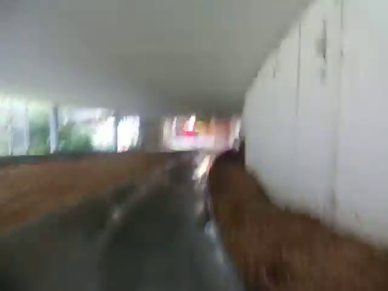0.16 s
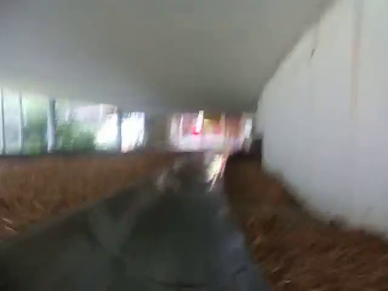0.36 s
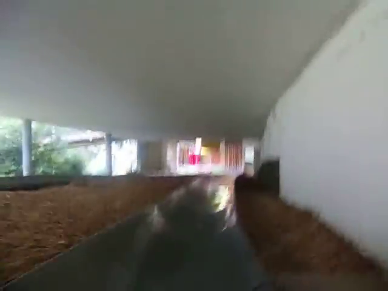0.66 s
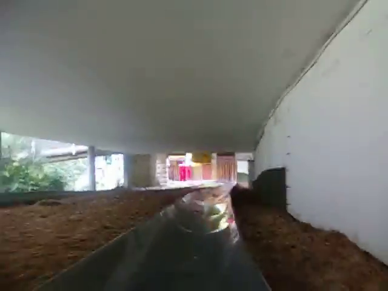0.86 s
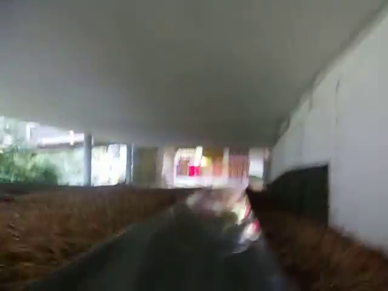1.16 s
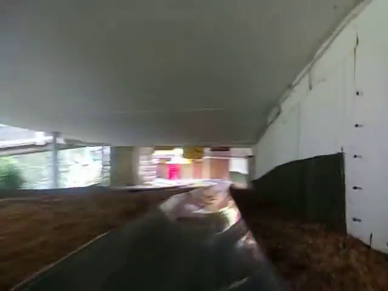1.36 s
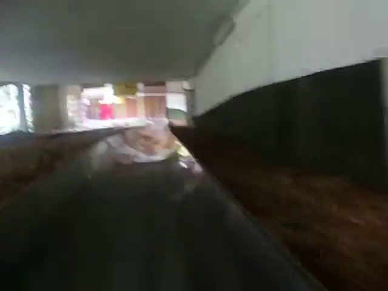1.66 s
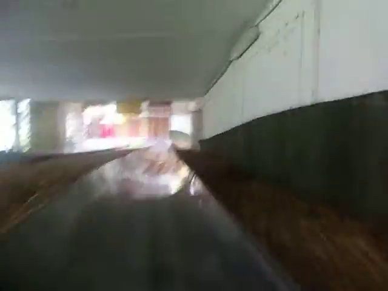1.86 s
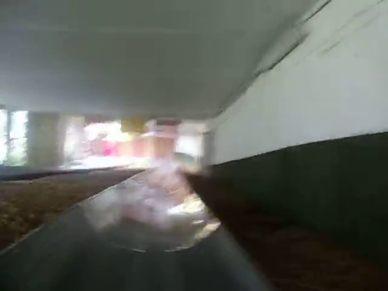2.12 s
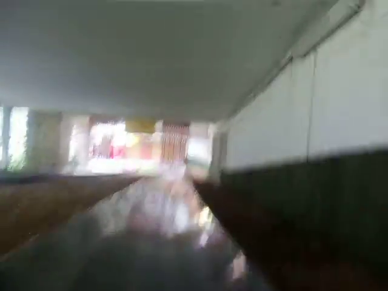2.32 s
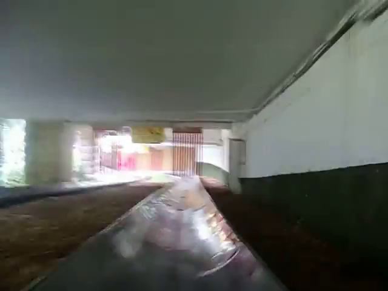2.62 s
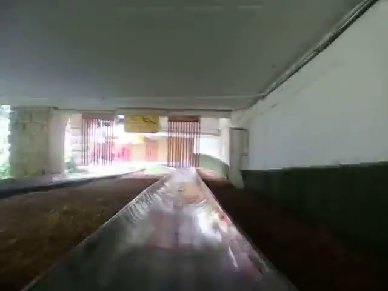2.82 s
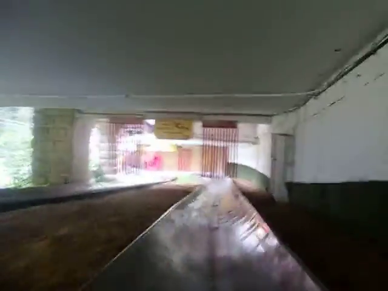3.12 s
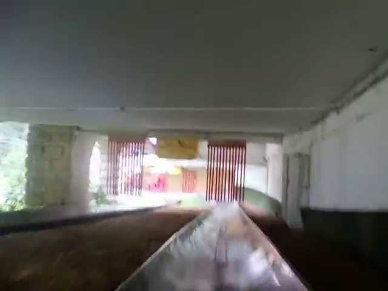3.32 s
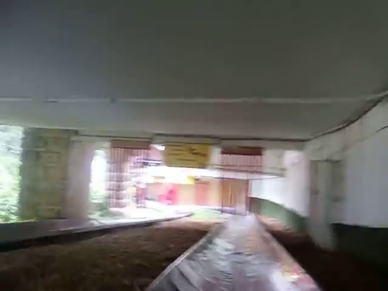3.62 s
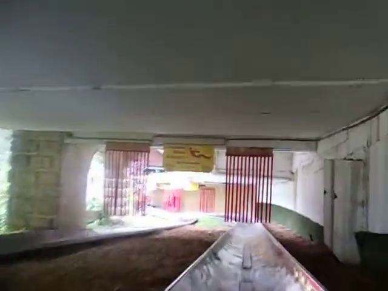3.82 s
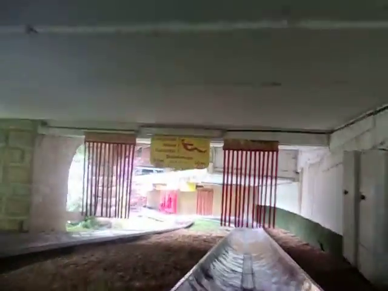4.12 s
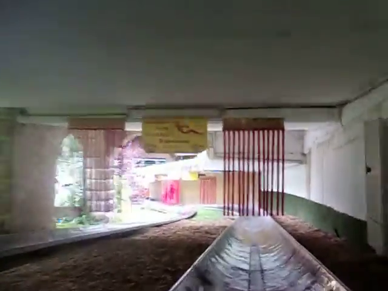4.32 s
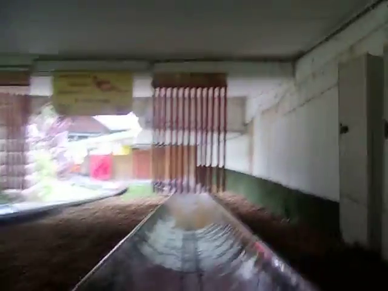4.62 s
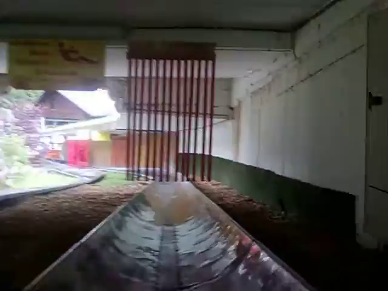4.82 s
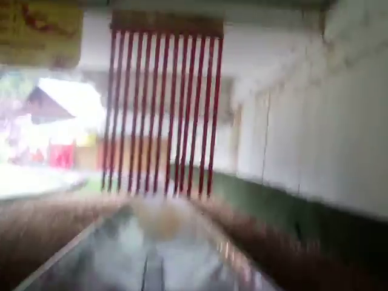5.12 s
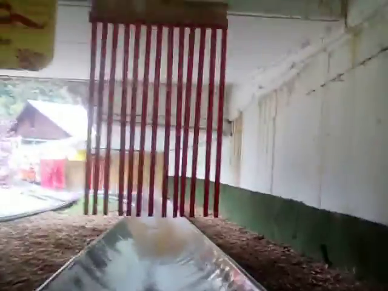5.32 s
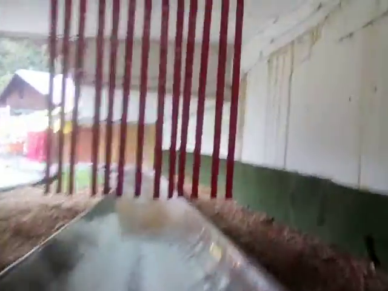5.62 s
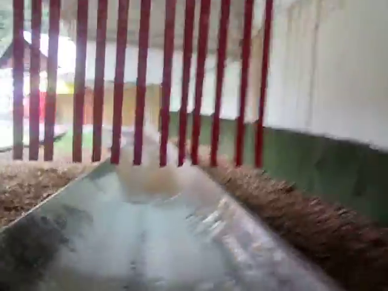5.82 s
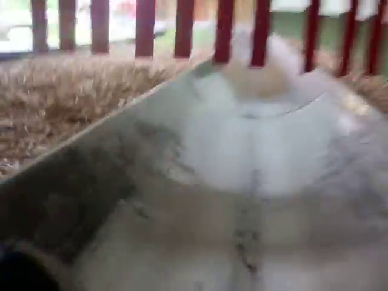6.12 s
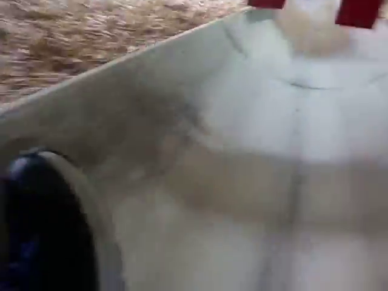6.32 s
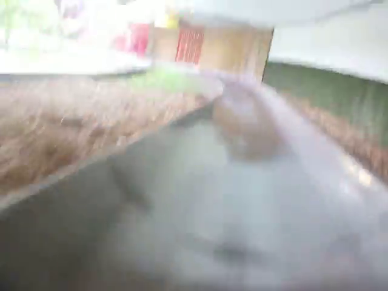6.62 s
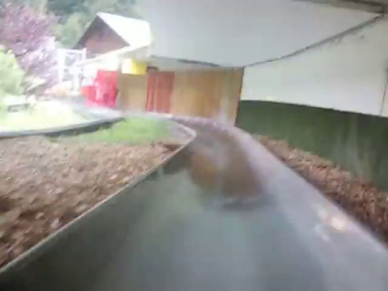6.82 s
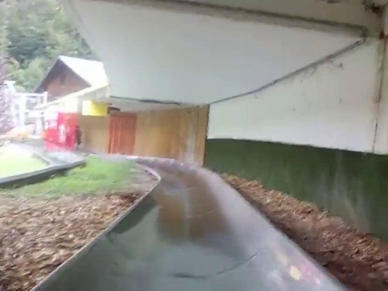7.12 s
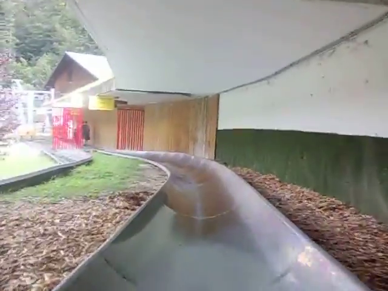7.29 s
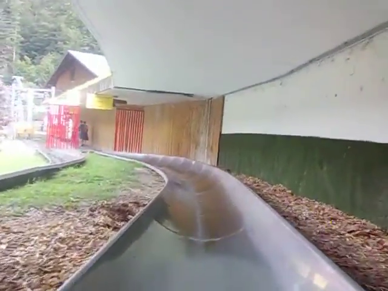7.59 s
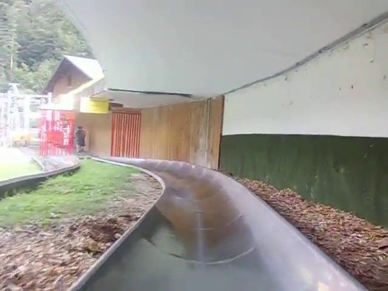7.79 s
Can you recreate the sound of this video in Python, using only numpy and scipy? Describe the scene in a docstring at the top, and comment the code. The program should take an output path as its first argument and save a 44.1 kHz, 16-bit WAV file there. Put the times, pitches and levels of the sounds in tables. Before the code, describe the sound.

A wheeled sled clatters fast down a sheet-steel trough, hollow metal knocks and rattles over rumble, thinning to scattered bumps as it slows.

```python
"""Wheeled sled in a steel trough

A sled rolls down a sheet-steel trough: rumble, hiss and hum are shaped noise, with damped bumps.
Wheel knocks excite dense damped modes of the sheet as noise; loose parts rattle in noise bursts.
Damped sines give the thuds, a singing bar and small chinks; hanging strips tick in short noise.
The loudest knocks overload the microphone, whose peaks are flattened."""
import sys
import numpy as np
from scipy import signal
from scipy.fft import rfft, irfft, next_fast_len
from scipy.io import wavfile
from scipy.ndimage import uniform_filter1d, map_coordinates

SR = 44100
rng = np.random.default_rng(int(sys.argv[2]) if len(sys.argv) > 2 else 0)


def wav_record(signal):
    """Record a signal, one row per channel, as 16-bit PCM in the file named by sys.argv[1]."""
    frames = np.transpose(np.atleast_2d(signal))
    bounded = np.clip(frames, -1, 1)
    # unit amplitude maps onto the largest positive 16-bit level
    quanta = np.round(bounded * 32767).astype(np.int16)
    wavfile.write(sys.argv[1], SR, quanta)


N = 350595  # samples


def amp(db):
    """Decibel law: the amplitude gain of a level in dB."""
    return 10 ** (np.asarray(db) / 20)


def unit(x):
    """Normalisation of power: x scaled to rms 1."""
    return x / np.sqrt(np.mean(np.abs(x) ** 2) + 1e-20)


def along(points, hz):
    """Interpolation of (hz, value) points on a logarithmic frequency axis."""
    f, v = np.transpose(points)
    return np.interp(np.log(hz + 1), np.log(f + 1), v)


def filtered(x, response):
    """Linear filtering: the spectrum of x times a response of frequency."""
    m = next_fast_len(x.shape[-1] + 8192)
    spectrum = rfft(x, m) * response(np.fft.rfftfreq(m, 1 / SR))
    return irfft(spectrum, m)[..., :x.shape[-1]]


def wobble(rate):
    """Band-limited fluctuation: a smooth random curve with rate knots a second."""
    knots = rng.standard_normal(int(N * rate / SR) + 4)
    return map_coordinates(knots, [np.arange(N) * rate / SR])


def add(track, s, sound):
    """Superposition: mixes a sound into the track from time s."""
    part = track[round(s * SR):][:len(sound)]
    part += sound[:len(part)]


def patchy(spectrum, patchy_db):
    """Non-stationary noise: coloured, rms 1, with random gain over patches of time and frequency."""
    z = signal.stft(rng.standard_normal(N + 512), nperseg=512)[2]
    field = uniform_filter1d(rng.standard_normal(z.shape), size=5, axis=0)  # smooth in frequency
    field = uniform_filter1d(field, size=6, axis=1)  # smooth in time
    noise = signal.istft(z * amp(patchy_db * unit(field)), nperseg=512)[1][:N]
    return unit(filtered(noise, lambda hz: amp(along(spectrum, hz))))


def overlaid(start_fraction, swings):
    """Superposition of many swings, one a row, from fractions of the whole duration; rms 1."""
    where = (start_fraction * N).astype(int) + np.arange(swings.shape[1])
    return unit(np.bincount(where.ravel(), swings.ravel(), minlength=N)[:N])


def rumble_db(s):
    """Slow level envelope of the rolling rumble at times s, linear between points."""
    # course of the rolling level: time_s, level_db
    roll_levels = [(0, -21.5), (.53, -20.5), (.75, -29.5), (1.7, -28.5), (2.6, -35.5), (3.7, -32.5),
                   (4.15, -32.5), (4.36, -22.5), (5.3, -22.5), (5.9, -27), (6.26, -20), (6.5, -28.5),
                   (7.2, -30.5), (7.5, -37), (7.95, -29.5)]
    return np.interp(s, *np.transpose(roll_levels))


def scattered(per_s, over_db, spread_db):
    """Chance events at uniform random times as (start_s, level_db); levels ride on the rumble."""
    draw = rng.random((int(per_s * N / SR), 2))
    s = .01 + draw[:, 0] * (N / SR - .02)
    return list(zip(s, rumble_db(s) + over_db + spread_db * (draw[:, 1] - .5)))


def grit(rate, spread_db, cycles):
    """Impact excitation: wheels on dents give damped swings at random pitch; rms 1."""
    draw, t = rng.random((int(rate * N / SR), 3)), np.arange(SR // 50) / SR
    hz = 900 * 4 ** draw[:, 1:2]
    size = amp(-spread_db * np.log(draw[:, 2:] + .02))
    envelope = size * np.exp(-t * hz / cycles) * (1 - np.exp(-t / 0.00045))
    return overlaid(draw[:, :1], envelope * np.sin(2 * np.pi * hz * t))


def pings():
    """Modal plucking: each small bump sounds one of a few short modes of the sled; rms 1."""
    # what the sled rings with on small bumps: pitch_hz, level_db
    ping_modes = [(1540, -1), (1720, -4), (3220, -8.5)]
    per_s, t60_s = 45, 0.053
    draw, t = rng.random((int(per_s * N / SR), 4)), np.arange(SR // 12) / SR
    chosen = (draw[:, 1:2] * len(ping_modes)).astype(int)
    hz, db = np.transpose(ping_modes)[:, chosen]
    size_db = db - 2.5 * np.log(draw[:, 2:3] + .02)
    envelope = amp(size_db - 60 * t / t60_s) * (1 - np.exp(-t / .0015))
    detune = .98 + 0.038 * draw[:, 3:]
    return overlaid(draw[:, :1], envelope * np.sin(2 * np.pi * hz * detune * t))


def rumble(level_db, bumps_db):
    """Rolling contact: roughness noise, grit and sled modes share one level shaken by bumps."""
    # colour of the rumble: frequency_hz, density_db (per Hz, relative)
    rumble_colour = [(15, -10), (45, -46), (110, -8), (230, -3.5), (290, 2.5), (360, -4), (550, -4),
                     (740, -4.5), (1200, -4.5), (1570, -1.5), (2000, -5.5), (2550, -11.5), (3250, -10.5),
                     (3600, -20.5), (5800, -33), (9000, -90)]
    grit_db, ping_db = -17.0, -11.5  # relative to the noise
    body = patchy(rumble_colour, patchy_db=1.14)
    body = body + amp(grit_db) * grit(rate=150, spread_db=3.5, cycles=2.4)
    body = body + amp(ping_db) * pings()
    return amp(level_db + bumps_db) * body


def hiss(swing_db, bumps_db):
    """Fine roughness noise: a treble that follows only a little of the rumble's modulation."""
    # colour of the hiss: frequency_hz, density_db (per Hz, relative)
    hiss_colour = [(2000, -33), (3500, 2), (5000, 1), (7300, 0), (9100, 1), (10300, -10.5), (11300, -7),
                   (13000, -18), (16000, -26)]
    mean_db, follows = -45, 0.064  # follows: share of the rumble's swings
    return amp(mean_db + follows * swing_db + 0.17 * bumps_db) * patchy(hiss_colour, patchy_db=3.0)


def drone(swing_db):
    """Low-frequency noise: the hum of air and ground, following part of the rumble's swings."""
    # colour of the hum: frequency_hz, density_db (per Hz, relative)
    drone_colour = [(12, -8), (25, 9), (60, -17), (110, -8), (200, -40), (400, -100)]
    mean_db, follows = -54, .5  # follows: share of the rumble's swings
    return amp(mean_db + follows * swing_db) * patchy(drone_colour, patchy_db=-1.0)


def rolling():
    """Amplitude modulation: wheels on rough steel, with slow and quick fluctuations of level."""
    level_db = rumble_db(np.arange(N) / SR)
    swing_db = level_db - level_db.mean()
    bumps_db = 1.22 * wobble(11) + 1.5 * wobble(90)
    return rumble(level_db, bumps_db) + hiss(swing_db, bumps_db) + drone(swing_db)


def knock(s, db, thump_db, bright_db, length, thump_hz):
    """Modal excitation: noise fills the sheet's dense modes and mostly dies faster in the treble."""
    # resonances of trough and sled: centre_hz, width_hz, level_db
    trough_modes = [(110, 70, -36), (274, 40, 6), (383, 67.4, 13), (753, 200, -1), (1067, 610, -4.5),
                    (1483, 318, 0.5), (2017, 294, 0), (2150, 68, -29), (2770, 90, -20), (3160, 220, -30)]
    # decay of a blow of length 1: frequency_hz, t60_s
    ring_decay = [(100, 1), (300, 0.3), (800, 0.49), (1800, 0.35), (3300, 0.18), (6000, 0.27),
                  (13000, 0.024)]
    # treble of a blow: frequency_hz, density_db (per Hz, relative)
    treble_colour = [(1470, -38), (2500, -0.5), (3330, 7.5), (3920, -9.5), (6550, -10.5), (8140, -19.5),
                     (9220, -10.5), (16000, -64)]
    # the panel that sings out changes along the track: start_s, pitch_hz
    panel_pitches = [(0, 1970), (.6, 1540), (2.05, 1850), (3.5, 900), (4.1, 1500), (4.45, 806),
                     (5.05, 1430), (5.68, 800), (5.8, 1354), (6.6, 1520)]
    rise_ms, rise_grows = 2.52, 1  # attack at length 1; longer, softer blows rise more slowly
    low_modes_db = 3.5  # the low trough modes follow the thump, offset by this
    t = np.arange(SR // 2) / SR
    centre, width, level_db = np.transpose(trough_modes)[:, :, None]
    panel_hz = [hz for start, hz in panel_pitches if start <= s][-1] * rng.normal(1, .06)
    hz, frames, z = signal.stft(rng.standard_normal(len(t)), SR, nperseg=256)

    # every blow lands on another spot
    strengths = amp(level_db + 2.1 * rng.standard_normal(level_db.shape))
    strengths = strengths * np.where(centre < 500, amp(thump_db + low_modes_db), 1)
    damping = (hz * width) ** 2
    resonance = damping / ((centre ** 2 - hz ** 2) ** 2 + damping)
    power = np.sum(strengths ** 2 * resonance, axis=0)
    # the panel under the wheel sings out
    power = power * (1 + 0.9 * np.exp(-((hz - panel_hz) / 260) ** 2))
    power = power / (1 + (hz / 3800) ** 8) * hz ** 4 / (hz ** 4 + 95 ** 4)
    colour = np.sqrt(power + amp(bright_db + along(treble_colour, hz)) ** 2)

    decay_db = -60 * frames / (max(length, .1) * along(ring_decay, hz)[:, None])
    # the wheel bounces: separate clacks a few ms apart
    chatter = amp(1.56 * rng.standard_normal(len(frames)))
    # a hard first crack, then the ring
    blow = np.sqrt(chatter) * amp(decay_db) + 0.98 * chatter * amp(3.6 * decay_db)
    ring = signal.istft(z * colour[:, None] * blow, SR, nperseg=256)[1][:len(t)]

    # the sled body thumps
    thump = amp(thump_db - 60 * t / 0.16) * np.sin(2 * np.pi * thump_hz * t)

    # single modes of the panel stand out of the noise for a moment
    pitch = centre[3:] * (1 + 0.055 * rng.standard_normal(centre[3:].shape))
    clang_envelope = amp(-16.5) * strengths[3:] * amp(-60 * t / (0.19 * length))
    clang = np.sum(clang_envelope * np.sin(2 * np.pi * pitch * t), axis=0)

    attack_ms = max(rise_ms * max(length, .1) ** rise_grows, .2)
    return amp(db) * (ring + thump + clang) * (1 - np.exp(-t * 1000 / attack_ms))


def knocks():
    """Impact series: wheels strike seams and dents, with small chance knocks in between."""
    # front and rear wheels often 0.11-0.13 s apart: start_s, level_db,
    # thump_db and treble_db (relative to level_db), length_factor, thump_hz
    wheel_blows = [(.018, -10, -7.5, -10, 0.94, 294), (.05, -8, -9, -12, .78, 319),
                   (.088, -5, -7.5, -12, 0.65, 363), (.167, -15, -8, -9, 1.7, 221),
                   (0.194, -10.5, -11, -8, 0.59, 307), (.245, 1, -9, -9.5, 0.63, 369),
                   (.328, -9.5, -8.5, -8.5, 2, 353), (.406, -1, -10, -10.5, 0.62, 404),
                   (.482, -10.5, -6, -16, 1.8, 275), (.516, -7.5, -12, -6.5, 0.43, 273),
                   (.566, -4, -8, -11.5, 0.65, 320), (.653, -2.8, -9.5, -9.5, 1.9, 254),
                   (.905, -5.5, -9, -11.5, 1.15, 299), (.924, -6.5, -16.5, -27, 1.35, 462),
                   (.983, -13.5, -11, -9.5, 1.8, 277), (1.027, -12, -9, -6.5, 1.08, 359),
                   (1.266, -6, -7.5, -15.5, 1.15, 271), (1.364, -12.5, -5, -8.5, 2.2, 403),
                   (1.394, -6, -3.5, -8.5, 1.6, 396), (1.486, -17, -3.5, -1.5, 1.07, 330),
                   (1.659, -11.5, 2.5, -33, 0.95, 308), (1.677, -6, -10, -17.5, 0.83, 406),
                   (1.764, -12, -12, -7.5, 1.25, 390), (1.798, -11.5, -6, -8.5, 1.34, 293),
                   (2.098, -4, -8.5, -17, 1.46, 406), (2.123, -8.5, -12.5, -16, 1.26, 406),
                   (2.213, -10, -7, -12, 2.57, 260), (2.28, -11.5, -15, -9, 1.1, 420),
                   (2.582, -21, -10, -17, .7, 455), (2.593, -4.5, -10, -10, 1.3, 271),
                   (2.721, -2, -7.5, -8.5, 1.22, 276), (2.784, -9, -8.5, -12.5, 2.2, 293),
                   (2.912, -12, -13, -16, 0.39, 231), (3.123, -16.5, -11, -46, 1.8, 277),
                   (3.259, -3.5, -7, -7, 1.62, 403), (3.329, -11.5, -6, -9.5, 0.65, 279),
                   (3.384, -23, -1.5, -20, 1.7, 287), (3.661, -10.5, -5, -15, 0.97, 422),
                   (3.679, -11, -14, -27, 1.25, 436), (3.778, -13, -15, -9, 1.3, 342),
                   (3.798, -14.5, -5.5, -6, 1.44, 284), (3.847, -10.5, -9.5, -14, 1.64, 440),
                   (4.186, -6.5, -8, -14, 2, 285), (4.295, -6.5, -7, -8, 1.67, 401),
                   (4.383, -17, -9, -8, 1.1, 458), (4.421, -7, -15, -12, 0.45, 290),
                   (4.491, -16, -14, -8, 1.4, 376), (4.573, -9, -1.5, -5.5, 1.08, 385),
                   (4.615, -13.5, -1, -8, 0.54, 268), (4.695, -7, -5.5, -16, 1.4, 391),
                   (4.78, -11.5, -7.5, -21, 0.89, 422), (4.834, -13, -4.5, -7, 1.25, 411),
                   (4.897, -8.5, -7.5, -9, 1.16, 288), (4.932, -10.5, -9.5, -8, 0.62, 280),
                   (5.08, 0, -12.5, -6.5, 0.79, 395), (5.102, -9.5, -17, -7.5, 0.62, 407),
                   (5.156, -4.5, -8, -14, 1.3, 392), (5.2, -14, -3.5, -7.5, 1.8, 421),
                   (5.297, 0.1, -9.5, -11, 1.3, 262), (5.353, -7.5, -26, -21, 1, 433),
                   (5.436, -11, -10, -14, 1.2, 366), (5.464, -5.5, -8, -9, 1.2, 249),
                   (5.528, -12.5, -5, -8.5, 2.7, 241), (5.675, -10, -13, -12, 0.69, 264),
                   (5.727, -12.5, -5, -6, 0.89, 389), (5.829, -16, -9, -14, 0.97, 398),
                   (5.948, -11.5, -6, -7.5, 0.88, 301), (6.007, -14, -9, -5.5, 1, 380),
                   (6.097, -15, -2, -12, 1.3, 357), (6.161, -4, -8, -5, 0.85, 236),
                   (6.287, -20, -9, 1, .65, 373), (6.319, -6, -11, -4, 1.15, 412),
                   (6.447, -13, -9, -6, 0.39, 271), (6.709, -18.5, -16, -24, 1.4, 360),
                   (6.803, -18, -17, -27, 1.8, 410), (6.999, -9, -7.5, -21, 1.32, 406),
                   (7.05, -14.5, -23, -27, 0.71, 410), (7.192, -12.5, -11.5, -10.5, 1.01, 233),
                   (7.217, -13, -9.5, -4.5, .89, 302), (7.285, -12.5, -8, -18, 0.8, 218),
                   (7.303, -13, -6.5, -14, 1.95, 283), (7.654, -25.5, -27, -11, 1.2, 285),
                   (7.82, -11.5, -5.5, -13.5, 1.3, 270), (7.845, -12, -10.5, -27, 1.06, 414)]
    out = np.zeros(N)
    chance = scattered(per_s=4.6, over_db=5, spread_db=5)
    small = [(s, db, -12, -12, 1.05, rng.uniform(244, 416)) for s, db in chance]
    for s, *blow in wheel_blows + small:
        add(out, s - .002, knock(s, *blow))
    return out


def rattles():
    """Repeated contact: loose parts snap on the frame in bright noise bursts of uneven level."""
    # loose parts rattling: start_s, level_db (before the colour)
    loose_parts = [(0.02, -17), (0.046, -12), (.192, -10), (.2269, -14), (.242, -11), (0.3507, -11),
                   (.404, -21), (.512, -16), (0.642, -19), (1.461, -16), (1.5174, -9), (2.246, -12),
                   (2.273, -12), (2.714, -6.5), (2.723, -5), (2.787, -12), (3.265, -13), (3.8358, -12.5),
                   (4.2797, -19), (4.375, -18), (4.4194, -25), (4.4912, -21), (4.565, -13), (4.809, -19),
                   (4.8883, -14), (5.056, -19), (5.078, -4), (5.155, -7.5), (5.539, -15), (5.6576, -18),
                   (5.6965, -18), (5.7548, -16), (5.947, -16), (6.1769, -10.5), (6.285, -20),
                   (6.3604, -17.5), (7.007, -21), (7.214, -25), (7.293, -13.5)]
    # colour of a snap: frequency_hz, density_db (per Hz, relative)
    snap_colour = [(2000, -26), (3500, -2.5), (6000, -10), (9500, -12.5), (12500, -24.5), (16000, -36)]
    t60_s = 0.063
    chatter_s, chatter_db = .0025, 4.5  # loose parts bounce: spacing and spread of the contacts
    out, t = np.zeros(N), np.arange(SR // 5) / SR
    for s, db in loose_parts + scattered(per_s=7.6, over_db=-6, spread_db=9):
        envelope = amp(db - 60 * t / t60_s) * np.minimum(t / 0.00076, 1)
        add(out, s, envelope * rng.standard_normal(len(t)))
    out = out * amp(chatter_db * wobble(1 / chatter_s))
    return filtered(out, lambda hz: amp(along(snap_colour, hz)))


def thuds():
    """Damped oscillation: seat and frame swing at a low pitch when the whole sled drops."""
    # drops of the sled: start_s, level_db, pitch_hz
    sled_drops = [(.089, -28, 108), (.454, -25.5, 83.4), (.643, -22, 87), (.909, -28, 95),
                  (1.268, -26, 80.7), (1.388, -18, 91.5), (2.096, -26, 85), (2.219, -22.5, 74),
                  (2.719, -19, 40.4), (3.779, -25, 109), (4.289, -28, 107), (4.816, -25, 111),
                  (5.101, -26.5, 105), (5.3, -23, 107), (5.459, -31, 91.5), (7.199, -28, 105)]
    out, t = np.zeros(N), np.arange(SR // 4) / SR
    for s, db, hz in sled_drops:
        envelope = amp(db - 60 * t / 0.21) * (1 - np.exp(-t / 0.0071))
        add(out, s, envelope * np.sin(2 * np.pi * hz * t))
    return out


def bar():
    """Single-mode ringing: a bar of the sled sings after a jolt, its phase wandering as it fades."""
    # jolts of the bar: start_s, level_db, pitch_hz
    bar_jolts = [(.2, -25, 2790), (0.334, -23, 2790), (0.521, -22, 2770), (.7, -25, 2770),
                 (5.54, -22.5, 2790)]
    out, t = np.zeros(N), np.arange(SR // 4) / SR
    for s, db, hz in bar_jolts:
        drift = np.cumsum(rng.normal(0, 0.0089, len(t)))
        envelope = amp(db - 60 * t / 0.27) * (1 - np.exp(-t / 0.002))
        add(out, s, envelope * np.sin(2 * np.pi * hz * t + drift))
    return out


def chinks():
    """Modal ringing: a small steel part sounds its own thin modes, each with a wandering phase."""
    # blows on the small part: start_s, level_db, top_modes_db
    part_blows = [(.255, -40, 0), (1.765, -41, -6), (2.29, -31, 3), (4.925, -41, 5), (5.55, -32, 6),
                  (5.75, -41, -2), (6.03, -34, -14), (6.18, -28, -10)]
    # modes of the small part: pitch_hz, level_db, t60_s
    part_modes = [(4120, -5, .07), (6500, 2, 0.13), (7600, -10, .05), (12200, -9, 0.11), (15200, -22, .1)]
    out, t = np.zeros(N), np.arange(SR // 4) / SR
    for s, db, top_db in part_blows:
        for hz, mode_db, t60 in part_modes:
            level_db = db + mode_db + top_db * (hz > 10000) + rng.normal(0, 2)
            drift = np.cumsum(rng.normal(0, 0.064, len(t)))
            envelope = amp(level_db - 60 * t / t60) * (1 - np.exp(-t / 0.0034))
            add(out, s, envelope * np.sin(2 * np.pi * hz * t + drift))
    return out


def ticks():
    """Impulsive noise: hanging strips brush past close by in dry clicks that die in milliseconds."""
    # brushes of the strips: start_s, level_db (before the colour)
    strip_brushes = [(6.393, -18), (6.399, -8), (6.407, 3), (6.413, -12)]
    # frequency_hz, gain_db
    tick_colour = [(1500, -30), (3500, -1), (5000, 2), (7200, 6), (11000, -16.0), (16000, -16)]
    out, t = np.zeros(N), np.arange(SR // 50) / SR
    for s, db in strip_brushes:
        add(out, s, amp(db - 60 * t / 0.0059) * rng.standard_normal(len(t)))
    return filtered(out, lambda hz: amp(along(tick_colour, hz)))


def scene():
    """Superposition: the pressures of all sources add at one microphone."""
    return (rolling() + knocks() + rattles() + thuds() + bar() + chinks() + ticks())[None]


def record(dry):
    """Saturation and band limiting: deep bass is lost, peaks flatten, the top is cut off."""
    clip_level, top_hz = .72, 15900  # clip_level: fraction of full scale

    def input_response(hz):
        """Filter response: a bass roll-off, and a narrow band weakened by the housing."""
        notch = 1 - .8 * np.exp(-((hz - 8270) / 230) ** 2)
        return notch * hz ** 2 / (hz ** 2 + 30 ** 2)

    x = filtered(dry, input_response)
    x = x / (1 + np.abs(x / clip_level) ** 16) ** (1 / 16)
    return filtered(x, lambda hz: np.clip((top_hz - hz) / 150, 0, 1))


dry = scene()
out = record(dry)
wav_record(out)
```